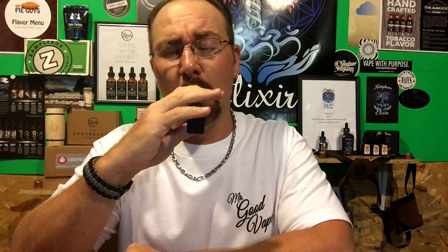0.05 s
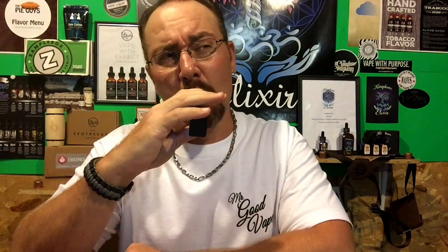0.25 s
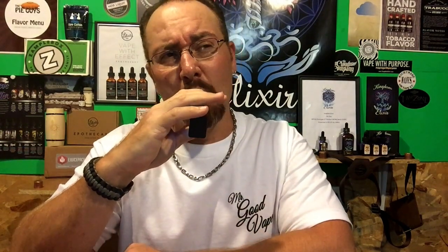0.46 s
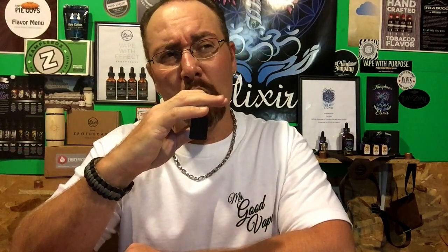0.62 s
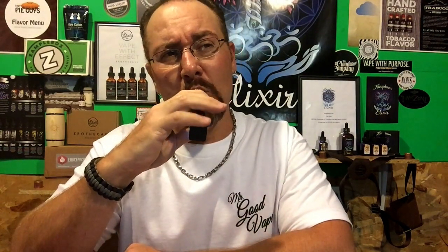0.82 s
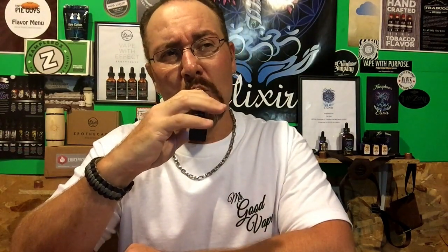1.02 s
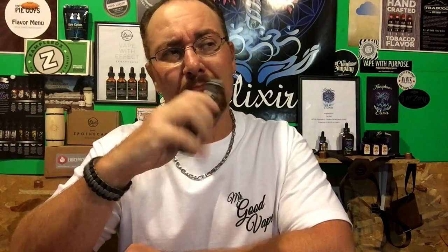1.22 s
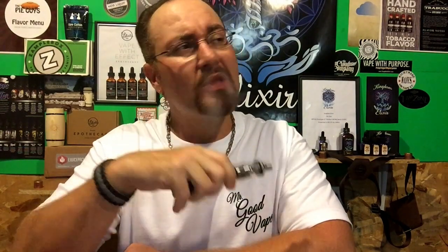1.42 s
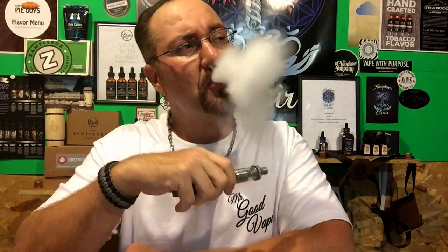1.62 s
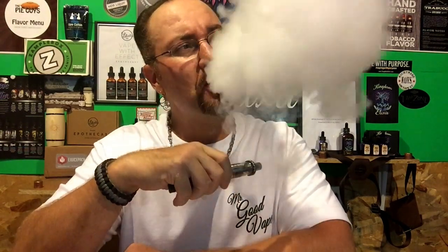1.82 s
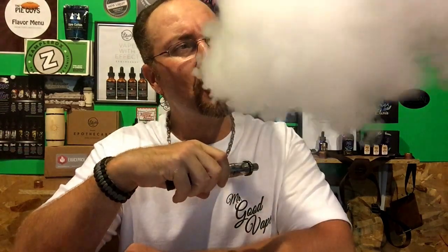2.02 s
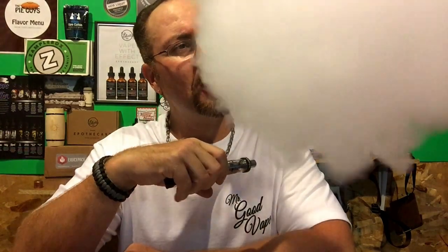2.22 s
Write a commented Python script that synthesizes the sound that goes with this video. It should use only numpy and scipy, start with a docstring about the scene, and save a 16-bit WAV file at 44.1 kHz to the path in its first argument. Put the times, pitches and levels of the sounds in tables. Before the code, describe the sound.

One draw on a vaporizer makes a steady, hollow hiss with fine crackling, close to the microphone. After a brief pause comes a soft lip click. A faint engine-like hum fades outside the small room.

```python
"""A small quiet room: an electronic vaporizer fires. Air hisses through its inlet slots and liquid
sizzles and spits on the coil, both ringing the tank's cavity. The airflow stops; a short cluster of
small clicks follows, perhaps lips parting. A low drone, probably an engine outside, comes through
the walls and sinks away."""
import sys
import numpy as np
from scipy import signal
from scipy.fft import rfft, irfft
from scipy.io import wavfile
from scipy.ndimage import uniform_filter1d, map_coordinates

SR = 44100
rng = np.random.default_rng(int(sys.argv[2]) if len(sys.argv) > 2 else 0)


def unload_wav(signal):
    """Save mono or channel-first audio to the path in sys.argv[1] as 16-bit WAV at rate SR, clipped to [-1, 1]."""
    wavfile.write(
        sys.argv[1],
        SR,
        np.round(np.clip(np.atleast_2d(signal).T, -1, 1) * 32767).astype(np.int16),
    )


N = 99533


def undb(db):
    """Decibels to gain."""
    return 10 ** (np.asarray(db) / 20)


def unit(x):
    """Scale to rms 1."""
    return x / np.sqrt(np.mean(x ** 2))


def curve(rows, column=1):
    """One column of a timed table, interpolated per sample."""
    rows = np.array(rows, float)
    return np.interp(np.arange(N) / SR, rows[:, 0], rows[:, column])


def walk(rate_hz):
    """Smooth random drift, rms 1."""
    hold = int(SR / rate_hz)
    steps = np.repeat(rng.standard_normal(N // hold + 1), hold)
    return unit(uniform_filter1d(steps, hold)[:N])


def response(slope=(), peaks=()):
    """Gain per frequency, rms 1: broad slope plus steep-sided resonances."""
    f = np.maximum(np.fft.rfftfreq(2 * N, 1 / SR), 1)
    power = sum(undb(db) ** 2 / (1 + ((f - hz) / width) ** 2 * 2) ** 2 for hz, width, db in peaks)
    if len(slope):
        hz, db = np.array(slope, float).T
        power = power + undb(np.interp(np.log(f), np.log(hz), db)) ** 2
    return unit(np.sqrt(power))


def ring(x, gain):
    """Minimum-phase filter with the given gain."""
    cepstrum = irfft(np.log(gain))
    cepstrum[1:N] *= 2
    cepstrum[N + 1:] = 0
    return irfft(rfft(x, 2 * N) * np.exp(rfft(cepstrum)))[:N]


def burst(start_s, db, decay_s, rough):
    """Impulse plus a noise tail with energy share `rough`; db is the level over 1 ms."""
    age_s = np.arange(N) / SR - start_s
    tail = rng.standard_normal(N) * np.exp(-np.abs(age_s) / decay_s) * (age_s > 0)
    x = tail * np.sqrt(rough / np.sum(tail ** 2))
    x[int(start_s * SR)] = np.sqrt(1 - rough)
    return x * undb(db) * np.sqrt(SR / 1000)


def air_jet():
    """The inlet jet rings the tank; resonances waver singly and drift together. Treble fades late."""
    # airflow through the tank (time [s], level [dB])
    flow = [(0, -49.5), (.17, -49.5), (.225, -48), (.27, -48), (.32, -48.5), (.39, -47), (.435, -48.5),
            (.48, -47), (.6, -47.5), (.68, -47.5), (.88, -47.8), (.96, -48.5), (1.09, -50.5), (1.14, -49),
            (1.195, -52.5), (1.22, -71), (1.245, -105)]
    # jet spectrum (frequency [Hz], relative gain [dB])
    jet = [(300, -27.5), (700, -22.5), (1100, -23.5), (1800, -16.5), (2100, -19.5), (2400, -11.5),
           (4400, -17), (5200, -25), (6500, -20.5), (8300, -21.5), (10500, -28.5), (13200, -34.5),
           (16000, -42.5)]
    # tank resonances (frequency [Hz], width [Hz], relative gain [dB])
    tank = [(2349, 31, 2), (2584, 210, -1.5), (3598, 217, 0), (3880, 330, -0.5), (4440, 380, -9),
            (5710, 350, -15.5), (6130, 160, -12.5), (7215, 360, -8), (8490, 54, -15.5), (9940, 300, -20),
            (11320, 320, -23.5), (14100, 230, -32)]
    # jet treble shelf (time [s], gain [dB])
    shelf = [(0, 1.5), (.16, 4), (.24, 1), (.35, 0), (.55, 0.5), (.8, -1.5), (.95, -3.5), (1.1, 0),
             (1.2, -12)]
    waver_db, drift, flutter_db, shelf_hz = .8, .003, .5, 7400
    hiss = ring(rng.standard_normal(N), response(jet, tank))
    for hz, width_hz, _ in tank:
        band = signal.filtfilt(*signal.iirpeak(hz, hz / (2 * width_hz), fs=SR), hiss)
        hiss = hiss + band * (undb(waver_db * walk(rate_hz=12)) - 1)
    position = np.cumsum(1 + drift * walk(rate_hz=7))
    hiss = map_coordinates(hiss, [position], order=5, mode="mirror")
    hiss = unit(hiss) * undb(curve(flow) + flutter_db * walk(rate_hz=34.37))
    treble = signal.sosfiltfilt(signal.butter(2, shelf_hz, "high", fs=SR, output="sos"), hiss)
    return hiss + treble * (undb(curve(shelf)) - 1)


def sizzle():
    """Tiny bubbles burst on the coil, harder as the cooling air stops, until the power goes off."""
    # boiling strength (time [s], level [dB])
    boil = [(0, -53), (.08, -58.5), (.25, -59.5), (.33, -61.5), (.38, -55.5), (.44, -57.5), (.8, -59.5),
            (1.12, -60.5), (1.165, -61), (1.205, -52), (1.218, -58.5), (1.24, -76.5)]
    # resonances rung by the bubbles (frequency [Hz], width [Hz], relative gain [dB])
    resonances = [(1042, 116, -2), (1234, 84, -2), (1490, 370, -6), (1680, 66, -3), (2304, 94, 1),
                  (2820, 260, -3.5), (3570, 1200, -12.5), (6460, 1500, -15.5), (14200, 2200, -32.5)]
    bubbles_per_s, spread_db = 900, 1
    bubbles = (rng.random(N) < bubbles_per_s / SR) * rng.choice([-1, 1], N)
    strength = undb(spread_db * np.minimum(rng.exponential(size=N), 4))
    return ring(unit(bubbles * strength) * undb(curve(boil)), response(peaks=resonances))


def drone():
    """Three wavering harmonics of one slow rotation over a muffled rumble."""
    # engine tone (time [s], fundamental [Hz], harmonic 2 [dB], harmonic 3 [dB], harmonic 4 [dB])
    engine = [(0, 39.23, -47.5, -60, -59.5), (.2, 42.35, -46, -58, -60.5), (.38, 41.83, -49.5, -59, -62.5),
              (.6, 43.54, -62, -59.5, -67.5), (.76, 43.52, -55.5, -88, -59),
              (.86, 44.58, -52.5, -83, -59.5), (1, 43.45, -61, -71, -72.5), (1.2, 41.92, -62.5, -66, -79),
              (1.3, 41.08, -75, -67, -85), (1.43, 39.47, -74, -55, -58), (1.6, 37.4, -86, -73, -64.5),
              (1.8, 34.9, -85, -61.5, -59), (1.92, 34.9, -81, -66.5, -75), (2.26, 32.7, -76, -104, -72)]
    # rumble spectrum (frequency [Hz], relative gain [dB])
    rumble_spectrum = [(25, -29), (40, -16.5), (56, -3.5), (75, -12), (115, 0.5), (165, 3.5), (225, -12.5),
                       (272, -5), (300, -12.5), (330, -6), (450, -29.5), (900, -50.5)]
    # rumble envelope (time [s], level [dB])
    rumble_level = [(0, -60), (.4, -56.5), (1.1, -59), (1.5, -60), (1.85, -63), (1.89, -71), (2.02, -61.5),
                    (2.08, -69.5), (2.26, -64.5)]
    waver_db = 1.8
    phase = 2 * np.pi * np.cumsum(curve(engine)) / SR
    tones = np.zeros(N)
    for k in (2, 3, 4):
        harmonic = np.sqrt(2) * np.sin(k * phase + 2 * np.pi * rng.random())
        tones += harmonic * undb(curve(engine, column=k) + waver_db * walk(rate_hz=23.63))
    rumble = ring(rng.standard_normal(N), response(rumble_spectrum))
    return tones + rumble * undb(curve(rumble_level))


def room_tone():
    """Faint, near-steady noise with two resonances."""
    # background spectrum (frequency [Hz], relative gain [dB])
    spectrum = [(100, -0.5), (300, 3), (500, 3), (1050, 5.5), (1700, -2), (2300, -6), (3200, -8.5),
                (5000, -15), (7000, -18.5), (10000, -22.5), (16000, -27.5)]
    # room resonances (frequency [Hz], width [Hz], relative gain [dB])
    resonances = [(1080, 54, 1.6), (2116, 230, 2)]
    # background envelope (time [s], level [dB])
    level = [(0, -67), (1.45, -67), (1.8, -67), (2.0, -68.5), (2.26, -67)]
    return undb(curve(level)) * ring(rng.standard_normal(N), response(spectrum, resonances))


def spits():
    """Single drops burst on the hot coil: a bright snap and a pop that rings the tank."""
    # bursting drops (time [s], pop [dB], snap [dB])
    drops = [(0.0502, -40.5, -66), (0.1435, -36, -45), (0.2063, -45, -70), (.2493, -50, -66),
             (0.3411, -48, -66), (0.3686, -38, -51), (1.133, -52, -57)]
    # pop resonances (frequency [Hz], width [Hz], relative gain [dB])
    pop_rings = [(1126, 350, -4.5), (1810, 260, -7), (2720, 380, 3), (4000, 590, -0.5), (5970, 410, -10),
                 (7120, 430, -4.5), (9800, 1700, -26)]
    # snap spectrum (frequency [Hz], relative gain [dB])
    snap_spectrum = [(2000, -26), (5000, -5), (7200, 1), (9000, -20), (14000, -19), (16000, -27)]
    decay_s, rough = .0015, .25
    pops = sum(burst(start_s, db, decay_s, rough) for start_s, db, _ in drops)
    snaps = sum(burst(start_s, db, decay_s, rough) for start_s, _, db in drops)
    return ring(pops, response(peaks=pop_rings)) + ring(snaps, response(snap_spectrum))


def clicks():
    """Small clicks after the draw, each a hollow knock, a higher clack and a bright tick."""
    # clicks (time [s], knock [dB], clack [dB], tick [dB], decay [s], tail energy share [0-1])
    events = [(1.5139, -66, -66, -49.5, .002, 0.75), (1.5157, -62, -60, -45, 0.0012, 0.7),
              (1.5166, -58, -54, -43, 0.002, 0.6), (1.5174, -52.5, -47, -48, 0.0028, 0.5),
              (1.521, -50, -49.5, -56, 0.002, .4), (1.5249, -36, -45.5, -44, 0.001, 0.1),
              (1.529, -56, -53, -57, 0.004, 0.6), (1.533, -45, -59, -66, 0.0015, 0.1),
              (1.5385, -64, -64, -62, .002, .6), (1.5485, -46, -60, -70, .0025, 0.2)]
    # knock spectrum (frequency [Hz], relative gain [dB])
    knock = [(500, -19), (720, -20), (850, 0.5), (1250, 6), (1700, 6), (1950, -30), (4000, -43.5),
             (16000, -53)]
    # upper cavity resonances (frequency [Hz], width [Hz], relative gain [dB])
    clack = [(2290, 120, 0.5), (2680, 330, 0.5), (3800, 660, -8)]
    # tick spectrum (frequency [Hz], relative gain [dB])
    tick = [(1000, -14), (2000, -16), (2700, -1), (3600, -10), (4700, -15), (5400, -4), (6400, -.5),
            (8000, -8), (9300, -2.5), (10700, -12), (12400, 1), (14500, 0), (16000, -5)]
    cluster = np.zeros(N)
    for k, colour in enumerate([response(knock), response(peaks=clack), response(tick)]):
        hits = sum(burst(start_s, dbs[k], decay_s, rough) for start_s, *dbs, decay_s, rough in events)
        cluster += ring(hits, colour)
    return cluster


def room(x):
    """Close walls add a short, dull tail."""
    t60_s, predelay_s, damping_hz, wet_db = .3, .004, 8140, -12.5
    t = np.arange(SR // 2) / SR
    tail = rng.standard_normal(len(t)) * np.exp(-np.log(1000) * t / t60_s) * (t > predelay_s)
    tail /= np.sqrt(np.sum(tail ** 2))
    tail = signal.sosfilt(signal.butter(1, damping_hz, fs=SR, output="sos"), tail)
    return x + undb(wet_db) * signal.fftconvolve(x, tail)[:N]


def scene():
    """Vaporizer and clicks in the room, over drone and room tone; both channels alike."""
    background = room_tone()
    mix = room(air_jet() + sizzle() + spits() + clicks()) + drone() + background
    return np.array([mix, mix])


def record(dry):
    """Steep elliptic low-pass."""
    cutoff_hz = 15800
    return signal.sosfilt(signal.ellip(10, .2, 70, cutoff_hz, fs=SR, output="sos"), dry)


dry = scene()
out = record(dry)
unload_wav(out)
```